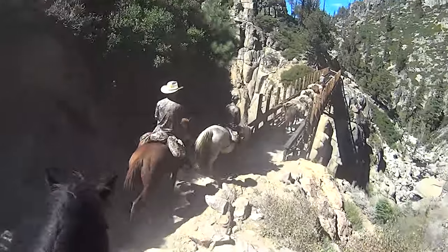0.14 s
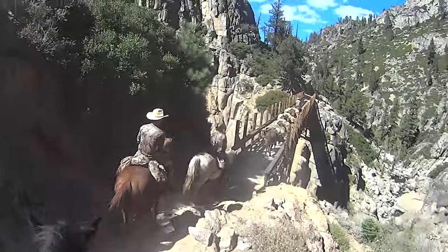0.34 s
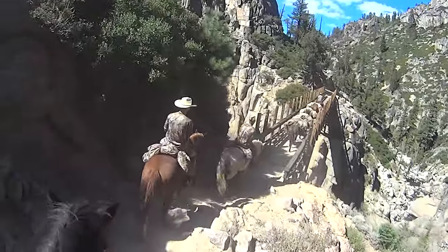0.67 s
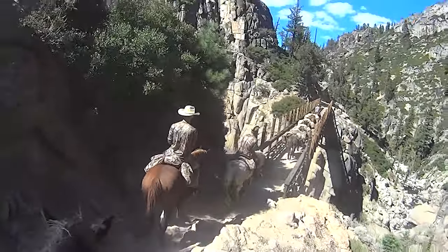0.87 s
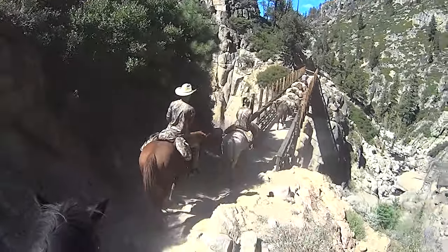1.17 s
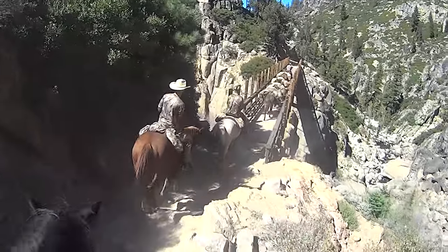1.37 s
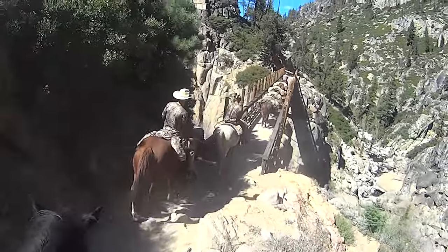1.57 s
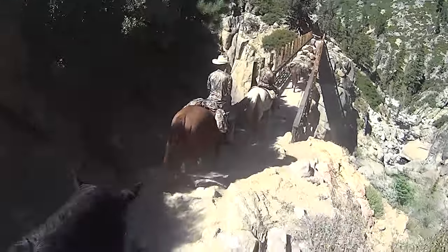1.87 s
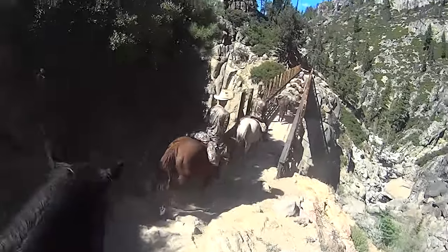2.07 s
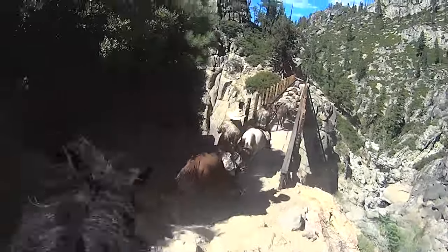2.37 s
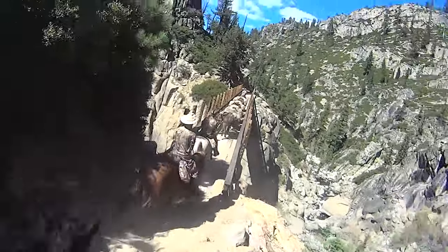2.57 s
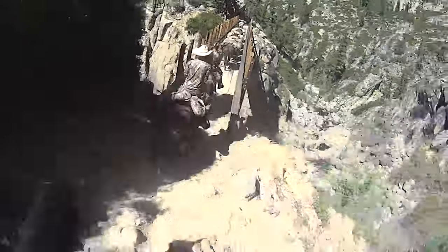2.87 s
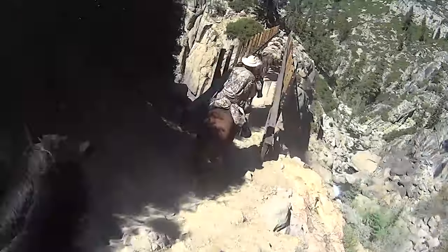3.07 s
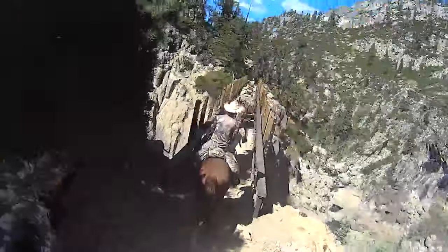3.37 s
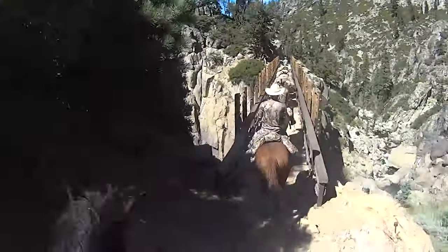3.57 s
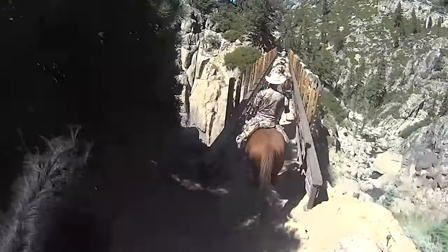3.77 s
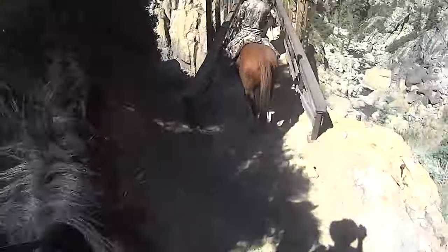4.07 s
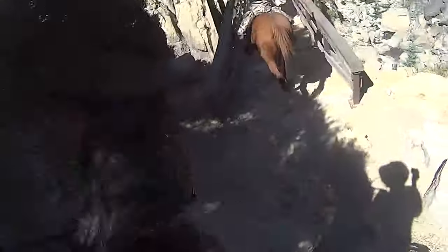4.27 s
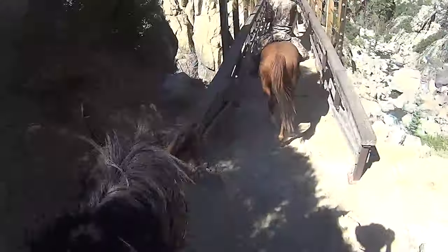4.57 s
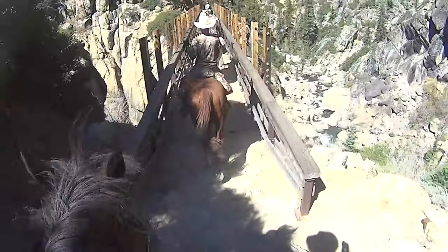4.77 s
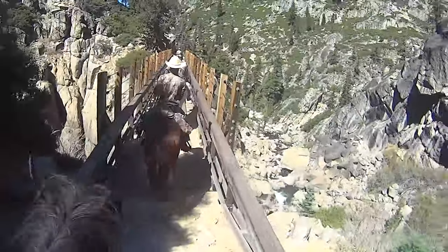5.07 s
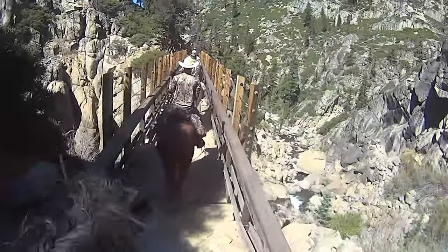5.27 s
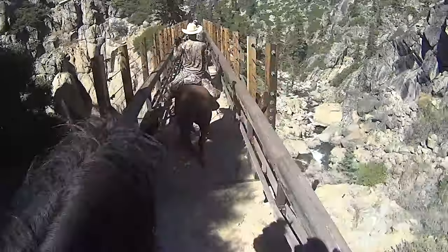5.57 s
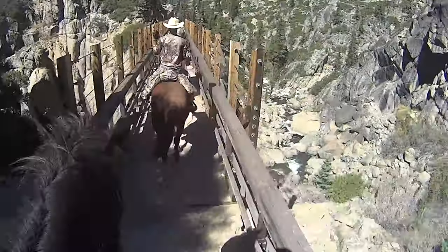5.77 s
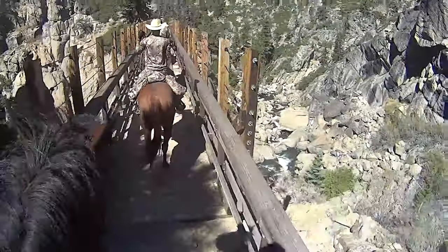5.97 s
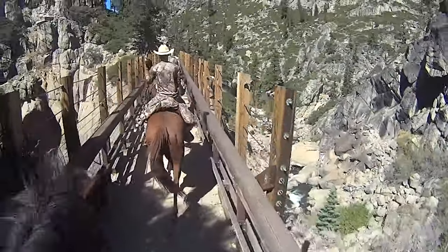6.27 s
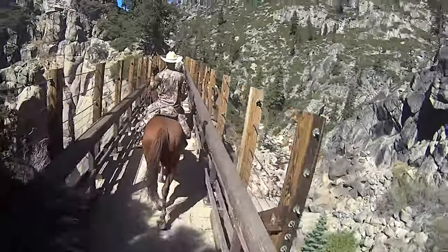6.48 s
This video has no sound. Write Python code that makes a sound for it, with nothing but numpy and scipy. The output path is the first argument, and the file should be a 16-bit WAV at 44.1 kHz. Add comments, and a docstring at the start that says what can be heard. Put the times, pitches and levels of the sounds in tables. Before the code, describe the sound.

A rider's stereo microphone hears horses walking from a rocky trail onto a plank bridge. Quiet creek rush, faint hiss and low handling rumble run throughout, the water slowly rising. From 0.3 s, light dry hoof clacks come irregularly, with gritty crunches near 1.0 s and small pebble ticks. At 1.8 s a stronger, lower, hollow clop lands, followed by crunchier steps at 2.0 and 2.2 s and a close pair around 2.55 s. Dull saddle bumps and heavier rumble come at 2.7-2.9 s. Scuffs gather at 3.2 s, then at 3.4 s one hard hollow wooden knock, the loudest event, rings briefly with a faint scatter off the rock. Uneven clops and scrapes continue from 3.6 s, with a bright stone crack at 5.2 s, a firm low clop at 6.0 s, a soft bump and last clack around 6.4 s, ending mid-walk at about 6.6 s.

```python
"""Horses on a trail to a plank bridge

Horses walk up a rocky, dusty trail onto a plank bridge, heard from the saddle of the last one.
Hooves clop, scuff and crush grit: filtered bursts of grains. One lands hard with a hollow wooden
knock, made of decaying sines. Pebbles tick and stones crack as short coloured bursts.
Dull thuds jostle the microphones; noise makes the handling rumble, two hisses and the creek below."""
import sys
import numpy as np
from scipy.fft import rfft, irfft, next_fast_len
from scipy.io import wavfile
from scipy.ndimage import uniform_filter1d, map_coordinates

SR = 44100
rng = np.random.default_rng(int(sys.argv[2]) if len(sys.argv) > 2 else 0)


def unload_audio(sound):
    """Save the sound as a 16-bit wav file, at the path given as the first command line argument."""
    columns = np.transpose(np.atleast_2d(sound))
    # keep every value between -1 and 1, then stretch to whole-number steps
    steps = np.round(np.clip(columns, -1, 1) * 32767)
    wavfile.write(sys.argv[1], SR, steps.astype(np.int16))


N = 292824
T = np.arange(SR // 3) / SR  # time within one hit, in seconds

# Hoof falls. Each row: start in seconds, overall level in dB, clack pitch in Hz, relative grit level in dB.
STEPS = [(0.297, -34, 1220, -39), (0.553, -29.5, 1740, -22.5), (0.742, -36, 1550, -33),
         (0.989, -34.5, 1610, -12), (1.463, -33.5, 1510, -27), (1.65, -29.5, 1300, -29),
         (1.818, -25.5, 775, -13.5), (2.002, -34, 1530, -3.5), (2.202, -31, 1050, -17),
         (2.528, -30, 1070, -19), (2.583, -33.5, 1940, -14.5), (3.204, -27.5, 1850, -14.5),
         (3.364, -26, 860, -31), (3.579, -27.5, 1910, -18), (3.968, -29.5, 1220, -23),
         (4.017, -31.5, 820, -14.5), (4.175, -29.5, 1990, -17), (4.505, -31, 1090, -35),
         (4.585, -34.5, 1620, -16), (4.784, -37.5, 900, -9), (5.099, -32, 1040, -22),
         (5.18, -31.5, 1950, -9), (5.294, -35, 1120, -15), (5.477, -29.5, 1560, -16),
         (5.6, -36.5, 840, -12), (5.898, -31, 1450, -14.5), (5.996, -25.5, 820, -18.5),
         (6.423, -28.5, 1500, -31)]
# Colour of a shod hoof on the ground. Each row: frequency in Hz, relative level in dB.
HOOF = [(100, -38), (300, 9), (520, 2.5), (750, 1.5), (1200, 2), (2000, 0), (2600, -6), (3300, 2),
        (4000, -17.5), (8000, -19)]
# Colour of crushed grit. Each row: frequency in Hz, relative level in dB.
GRIT = [(1000, 2.5), (2500, 7), (3500, 10), (4400, 1), (5300, 9), (6500, -4), (11000, -16.5)]
USUAL_GRIT_DB = -16.5  # grit of an ordinary fall


def amp(db):
    """Decibels to gain."""
    return 10 ** (np.asarray(db) / 20)


def unit(x):
    """Scale to rms 1."""
    return x / np.sqrt(np.mean(x ** 2) + 1e-20)


def crest(x):
    """Scale a hit so that its loudest 4 ms have rms 1."""
    power = uniform_filter1d(np.mean(x ** 2, axis=0), size=176)
    return x / np.sqrt(power.max())


def along(points, hz):
    """Interpolate (Hz, value) points on a log frequency axis."""
    f, v = np.transpose(points)
    return np.interp(np.log(hz + 1), np.log(f + 1), v)


def wobble(rate):
    """A smooth random curve with rate knots a second."""
    knots = rng.standard_normal(int(N * rate / SR) + 4)
    return map_coordinates(knots, [np.arange(N) * rate / SR])


def coloured(x, db_of):
    """Causal minimum-phase filter whose gain in dB is a function of frequency."""
    n = x.shape[-1]
    m = 2 * next_fast_len(n // 2 + 2048)
    cepstrum = irfft(np.log(amp(db_of(np.fft.rfftfreq(m, 1 / SR))) + 1e-6))
    # folding the cepstrum onto positive time gives the phase
    fold = 1 + np.sign(m // 2 - np.arange(m))
    fold[0] = 1
    return irfft(rfft(x, m) * np.exp(rfft(cepstrum * fold)))[..., :n]


def resonance(hz, centre, q):
    """Gain in dB of one damped mode."""
    return -10 * np.log10(1 + (q * ((hz + 1) / centre - centre / (hz + 1))) ** 2)


def add(out, s, x):
    """Mix x into out from time s."""
    part = out[:, max(0, round(s * SR)):][:, :x.shape[1]]
    part += x[:, :part.shape[1]]


def grains(n, spiky_db, width):
    """Stereo stream of tiny contacts whose force changes at random every 32 samples."""
    force_db = spiky_db * np.repeat(rng.standard_normal(n // 32 + 1), 32)[:n]
    mid, side = rng.standard_normal((2, n)) * amp(force_db)
    return np.array([mid + width * side, mid - width * side])


def diffuse_noise(spectrum, spiky_db, lag=0):
    """Stereo noise of rms 1, nearly mono in the bass; it reaches the left microphone lag seconds late."""
    # Likeness of left and right. Each row: frequency in Hz, coherence from 0 to 1.
    coherence = [(80, 1), (150, 1), (250, 0.71), (380, 0.056), (11000, 0.14)]
    alike = lambda hz: np.clip(along(coherence, hz), -.999, .999)
    mid, side = grains(N, spiky_db, 0.98)
    mid = coloured(mid, lambda hz: along(spectrum, hz) + 10 * np.log10(1 + alike(hz)))
    side = coloured(side, lambda hz: along(spectrum, hz) + 10 * np.log10(1 - alike(hz)))
    return unit(np.array([np.roll(mid + side, round(lag * SR)), mid - side]))


def hoof_falls(clack_db=-7, clop_db=-13, crush_db=0, clop_hz=790, give=0.0038, bite=2.25, rim=6.1, cliff_db=-26):
    """The rim strikes, the hollow sole clops, and grit gives way as the hoof rolls onto its toe."""
    # Hollowness of the ground toward the bridge. Each row: time in seconds, relative clop level in dB.
    hollow = [(1.6, -26), (1.8, -4.5), (4.0, -8), (6.6, -5.5)]
    # a high, glancing fall is over sooner than a flat, low one
    settle_s, flat_hz, glance_power = 0.091, 980, 0.49
    # the toe follows the heel, and takes more of the weight on loose grit
    roll_s, toe_db, toe_per_grit = .005, -7.5, 0.19
    out = np.zeros((2, N))
    for s, db, pitch, grit_db in STEPS:
        hollow_db = np.interp(s, *np.transpose(hollow))
        t60 = settle_s * (flat_hz / pitch) ** glance_power
        heel = bite * amp(-60 * T / 0.0099)
        toe_peak_db = toe_db + toe_per_grit * (grit_db - USUAL_GRIT_DB)
        toe = amp(toe_peak_db - 60 * abs(T - roll_s) / .02) * (T > roll_s)
        cliff = amp(cliff_db - 60 * T / 0.26)  # the cliff answers faintly
        settle = heel + toe + amp(-60 * T / t60) + cliff
        blow = grains(len(T), spiky_db=3, width=.45) * settle
        blow[:, 0] += rim  # first contact of the rim
        clack = coloured(blow, lambda hz: along(HOOF, hz) + .5 * resonance(hz, pitch, q=21))
        clop = coloured(blow, lambda hz: resonance(hz, clop_hz, q=4.4) + resonance(hz, 950, q=0.63))
        weight = settle * (1 - np.exp(-T / give))  # grit yields over a time constant of give seconds
        crush = coloured(grains(len(T), spiky_db=5, width=.6) * weight, lambda hz: along(GRIT, hz))
        fall = amp(clack_db) * crest(clack)
        fall += amp(clop_db + hollow_db) * crest(clop)
        fall += amp(crush_db + grit_db) * crest(crush)
        add(out, s, amp(db) * fall)
    return out


def knock(lag=.00009, attack=0.0012, pan_db=1):
    """One hard blow: the hoof cracks, the timber rings on; the ring reaches the left microphone first."""
    # The hard blow on timber: start in seconds, gain in dB.
    hard_blow = (3.4041, 0)
    # Short modes of the hoof, then long ones of the wood. Each row: pitch in Hz, level in dB, t60 in seconds.
    timber = [(944, -8, 0.022), (1496, -12.5, 0.024), (1636, -9, 0.017), (2330, -46, 0.0073),
              (3270, -19, 0.012), (4400, -29, 0.011), (5100, -33, .008), (650, -31, 0.12),
              (756, -28, 0.099), (825, -31.5, 0.22), (872, -17.5, 0.086), (954, -27, 0.08),
              (1100, -33.5, 0.22), (1535, -39.5, 0.16)]
    out = np.zeros((2, N))
    s, db = hard_blow
    t = np.maximum(T - np.array([[0], [lag]]), 0)
    ring = 0
    for hz, level, t60 in timber:
        # the higher a mode, the sooner it is in full swing
        onset = 1 - np.exp(-(t / attack) ** 2 * hz / 1000)
        ring = ring + amp(level - 60 * t / t60) * np.sin(2 * np.pi * hz * t) * onset
    # rock and railing scatter the blow back
    echoes = grains(len(T), spiky_db=2, width=0.6) * amp(-60 * T / 0.067)
    scatter = coloured(echoes, lambda hz: along(HOOF, hz) + resonance(hz, 900, q=2.3))
    pan = amp([[pan_db / 2], [-pan_db / 2]])
    add(out, s, (amp(db) * ring + amp(-26.5) * crest(scatter)) * pan)
    return out


def strokes():
    """List separate scuffs, and a skim and a slide around each fall, both stronger on loose grit."""
    # Separate scuffs. Each row: time in seconds, overall level in dB, pitch in Hz, relative grit level in dB.
    separate = [(0.426, -42, 950, -17), (0.83, -42.5, 1520, -7), (0.9, -46, 1470, -20),
                (1.17, -45, 1480, -4), (1.811, -34.5, 1160, -12), (1.935, -38, 1580, -18),
                (2.172, -41, 1990, -12), (2.21, -35.5, 1450, -11), (2.457, -46, 1130, -22),
                (2.624, -39.5, 1180, -3), (2.85, -44, 1060, -1), (3.157, -42, 1390, -5),
                (3.222, -37.5, 1250, 0.5), (3.261, -44, 720, 0), (3.329, -38.5, 1590, -18),
                (3.919, -39, 1200, -8), (4.335, -42, 775, -16), (4.48, -40, 1190, -22),
                (4.995, -42, 1086, -26), (5.045, -41, 1240, -9), (6.32, -40.5, 1420, -8)]
    # skim before landing, slide after it: (seconds from the fall, dB relative to the fall)
    skim, slide = (-.02, -25.5), (.014, -20)
    slide_per_grit = 0.48  # dB more skim and slide for each dB of grit
    loose_db = 9  # extra grit under a sliding hoof
    found = list(separate)
    for s, db, pitch, grit_db in STEPS:
        for delay, under_db in (skim, slide):
            level_db = db + under_db + slide_per_grit * (grit_db - USUAL_GRIT_DB)
            found.append((s + delay, level_db, pitch, grit_db + loose_db))
    return found


def scuffs(scrape_db=-4, crush_db=-6):
    """A sliding hoof swells and fades as a short rasp of densely packed grains."""
    out = np.zeros((2, N))
    u = T / 0.049  # time in strokes of 49 ms
    swell = u ** 0.5 * np.exp(-3.2 * u)
    rasp = lambda: grains(len(T), spiky_db=5, width=.55) * swell
    for s, db, pitch, grit_db in strokes():
        scrape = coloured(rasp(), lambda hz: along(HOOF, hz) + .5 * resonance(hz, pitch, q=11.0))
        crush = coloured(rasp(), lambda hz: along(GRIT, hz))
        scuff = amp(scrape_db) * crest(scrape) + amp(crush_db + grit_db) * crest(crush)
        add(out, s - .003, amp(db) * scuff)  # the swell begins 3 ms ahead
    return out


def snaps(t60=0.02):
    """A stone pinched under a shoe cracks with one short, bright burst."""
    # Cracking stones. Each row: start in seconds, level in dB.
    cracks = [(0.989, -44.5), (1.174, -41.5), (1.826, -41.5), (3.58, -40), (5.181, -31.5)]
    # Colour of a cracking stone. Each row: frequency in Hz, relative level in dB.
    stone = [(500, -32), (2500, -19), (3700, 1), (4400, 5.5), (5600, -6), (6800, -16.5), (11000, -24)]
    out = np.zeros((2, N))
    for s, db in cracks:
        burst = grains(len(T), spiky_db=1, width=0.87) * amp(-60 * T / t60)
        add(out, s, amp(db) * crest(coloured(burst, lambda hz: along(stone, hz))))
    return out


def pebbles(pebble_db=-52, pebble_hz=1900, count=70):
    """Small loose stones tick at random, each at its own pitch, the higher ones tending softer."""
    out, t = np.zeros((2, N)), T[:len(T) // 8]
    times = rng.uniform(0, N / SR, count)
    for s, (height, force) in zip(times, rng.uniform(-1.13, 1, (count, 2))):
        pitch = pebble_hz * 2 ** (1.05 * height)
        contact = grains(len(t), spiky_db=7.0, width=0.31) * amp(-60 * t / 0.044)
        tick = coloured(contact, lambda hz: along(HOOF, hz) + resonance(hz, pitch, q=16.0))
        add(out, s, amp(pebble_db + 1.2 * force - 2 * height) * crest(tick))
    return out


def jolts(jolt_db=-2, thud_hz=100):
    """Dull bumps travel through saddle and rider into the microphones."""
    # Jolts of the saddle. Each row: start in seconds, level in dB before the common jolt_db.
    bumps = [(0.16, -43.5), (0.753, -37.5), (1.672, -37), (2.693, -30), (2.781, -42), (2.865, -34.5),
             (3.293, -34.5), (3.35, -32.5), (4.789, -37), (5.42, -38), (6.38, -33.5)]
    out = np.zeros((2, N))
    for s, db in bumps:
        push = grains(len(T), spiky_db=-1.5, width=0.1) * amp(-60 * T / 0.034)
        thud = coloured(push, lambda hz: resonance(hz, thud_hz, q=2.06) + resonance(hz, 191, q=1.24))
        add(out, s, amp(db + jolt_db) * crest(thud))
    return out


def handling_rumble():
    """Low noise of handling, its level following the sway of the ride with a random wobble."""
    # Sway of the ride. Each row: time in seconds, mean rumble level in dB.
    sway = [(0, -50), (.9, -45), (1.15, -50), (2.7, -40.5), (3.4, -42), (4.4, -44.5), (5.6, -45.5),
            (6.64, -43.5)]
    # Colour of the rumble. Each row: frequency in Hz, relative level in dB.
    low_colour = [(10, -9), (25, 0.5), (50, 0), (80, -3), (115, -6), (170, -12.5), (280, -19), (500, -30),
                  (1500, -43)]
    level_db = np.interp(np.arange(N) / SR, *np.transpose(sway)) + 2.2 * wobble(21)
    return amp(level_db) * diffuse_noise(low_colour, spiky_db=2.5)


def creek(start_db=-53, db_per_s=0.41):
    """Rushing water in the canyon, off to the right, rippling and growing louder as it comes nearer."""
    # Colour of the water. Each row: frequency in Hz, relative level in dB.
    water = [(60, -28.5), (250, -1.5), (480, 0), (800, -2), (1250, 0.5), (1700, -2), (2100, -6.5),
             (2800, -6.5), (3900, -8), (6000, -15), (11000, -22.5)]
    level_db = start_db + db_per_s * np.arange(N) / SR + .7 * wobble(25)
    return amp(level_db) * diffuse_noise(water, spiky_db=1.5, lag=0.00014)


def wandering_hiss(wandering_db=-70):
    """Bright, uneven hiss of randomly wandering level, strongest near 5.3 kHz."""
    # Colour of the wandering hiss. Each row: frequency in Hz, relative level in dB.
    bright = [(1500, -18), (3500, -13), (5300, 4), (6500, -12), (11000, -14)]
    return amp(wandering_db + 2.3 * wobble(8)) * diffuse_noise(bright, spiky_db=4.5)


def even_hiss(hiss_db=-69):
    """A bright noise floor of constant level."""
    # Colour of the hiss. Each row: frequency in Hz, relative level in dB.
    hiss = [(500, -24), (4000, -16), (7000, 4.5), (11000, -5)]
    return amp(hiss_db) * diffuse_noise(hiss, spiky_db=2.5)


def scene():
    """Sum the hooves, stones, jolts and surroundings of the trail."""
    hooves = hoof_falls() + knock() + scuffs()
    stones = snaps() + pebbles()
    surroundings = handling_rumble() + creek() + wandering_hiss() + even_hiss()
    return hooves + stones + jolts() + surroundings


def record(dry):
    """The case rings a little, each microphone port has its own colour, and the band ends steeply."""
    # Case modes, moving both ports together or against each other.
    # Each row: centre in Hz, width in Hz, gain together in dB, gain against in dB.
    modes = [(524, 200, -2.5, 0.5), (743, 120, 4.5, 3.5), (1148, 140, 4, -3.5), (1555, 42, 8, -22),
             (2003, 115, 6, -26), (2450, 940, -1.5, 8), (3162, 147, 6, -10), (3830, 710, -5, -1.5),
             (5250, 320, 5.5, -3.5)]
    # Unequal colour of the ports. Each row: frequency in Hz, left minus right in dB.
    ports = [(400, 0), (600, 1.5), (850, 0), (1060, 3), (1300, -3), (1680, -4.5), (1860, 2), (2130, -3),
             (2450, 7), (2900, 3), (3400, -5), (3950, 2.5), (5000, -2), (7000, 0)]
    top_hz = 11150  # end of the band

    def case(hz):
        """Sum the modes' bell-shaped gains in dB, for mid and side."""
        total = 0
        for centre, width, together_db, against_db in modes:
            bell = 1 / (1 + (2 * (hz - centre) / width) ** 2)
            total = total + np.outer([together_db, against_db], bell)
        return total

    left, right = dry
    mid, side = coloured(np.array([left + right, left - right]) / 2, case)
    heard = coloured(np.array([mid + side, mid - side]), lambda hz: np.outer([.5, -.5], along(ports, hz)))
    m = next_fast_len(N + 8192)
    in_band = np.fft.rfftfreq(m, 1 / SR) < top_hz
    return irfft(rfft(heard, m) * in_band, m)[:, :N]


dry = scene()
out = record(dry)
unload_audio(out)
```